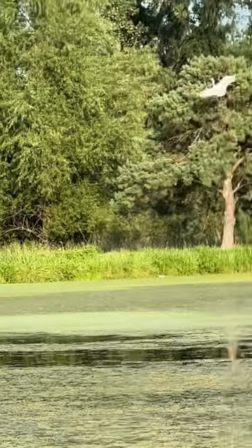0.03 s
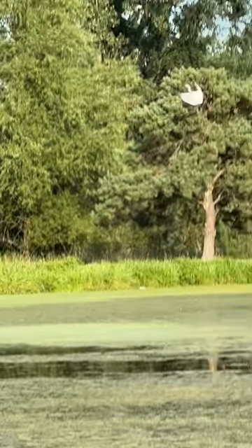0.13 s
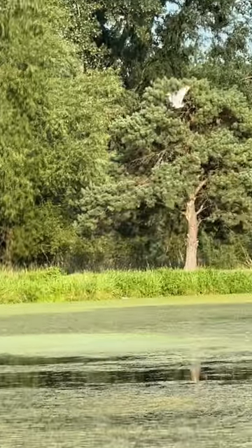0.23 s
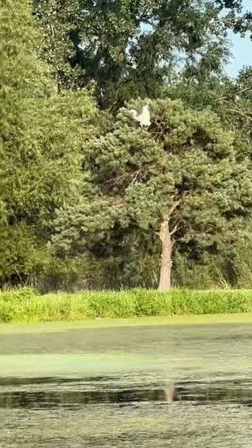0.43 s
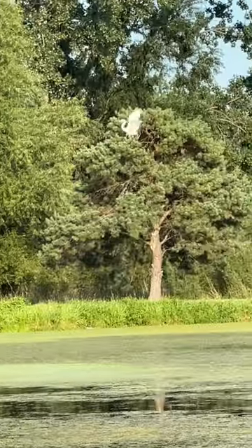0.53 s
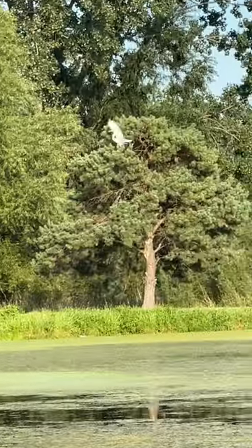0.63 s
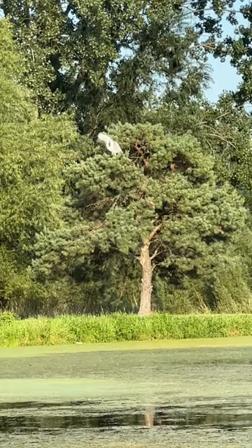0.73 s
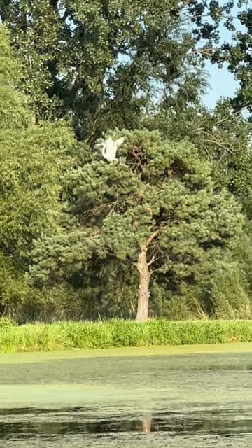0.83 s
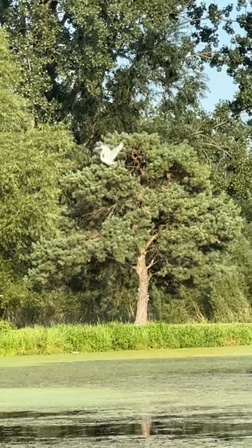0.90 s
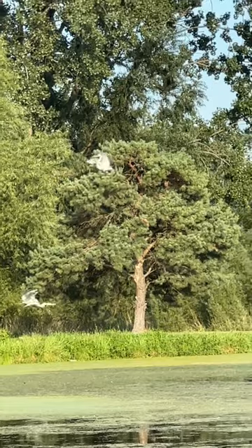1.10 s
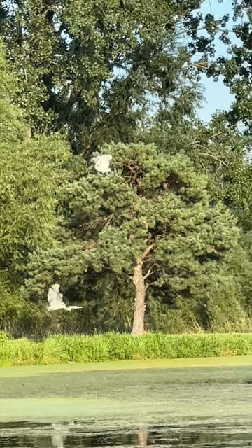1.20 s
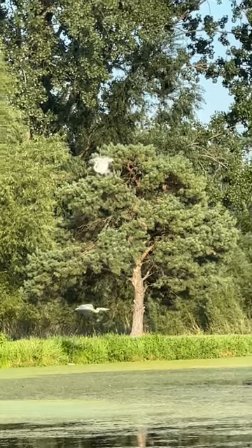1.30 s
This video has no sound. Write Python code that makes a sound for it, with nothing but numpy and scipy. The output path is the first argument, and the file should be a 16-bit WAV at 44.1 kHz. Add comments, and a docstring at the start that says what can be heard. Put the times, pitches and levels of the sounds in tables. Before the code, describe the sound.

A large water bird gives one harsh, honking squawk over faint outdoor hiss.

```python
"""A distant low rumble, a soft hiss of air and high insects, heard from the edge of a pond.
Just left of the microphone a large water bird squawks once: rising pulses of its syrinx ring
the throat in a croak, then the voice breaks into a clear, falling honk.
The trees on the far bank send back a faint echo, and one small tick sounds near the end."""
import sys
import numpy as np
from scipy import signal
from scipy.fft import rfft, irfft, next_fast_len
from scipy.io import wavfile
from scipy.ndimage import map_coordinates

SR = 44100
rng = np.random.default_rng(int(sys.argv[2]) if len(sys.argv) > 2 else 0)


def generate_wav(signal):
    """Clip the signal to [-1, 1] and save it as 16-bit WAV at the path in sys.argv[1]."""
    frames = np.transpose(np.atleast_2d(signal))
    scaled = np.clip(frames, -1, 1) * 32767
    pcm = np.round(scaled).astype(np.int16)
    wavfile.write(sys.argv[1], SR, pcm)


N = 59535
TIME = np.arange(N) / SR


def amp(db):
    """Decibels to gain."""
    return 10 ** (np.asarray(db) / 20)


def unit(x):
    """Scale to rms 1."""
    return x / np.sqrt(np.mean(x ** 2) + 1e-20)


def along(points, hz):
    """Read (Hz, value) points along a log frequency axis."""
    f, v = np.transpose(points)
    return np.interp(np.log(hz + 1), np.log(f + 1), v)


def curves(rows):
    """One value per sample for each column after the time."""
    seconds, *columns = np.transpose(rows)
    return [np.interp(TIME, seconds, column) for column in columns]


def wobble(rate):
    """A smooth random curve, rate knots a second."""
    return map_coordinates(rng.standard_normal(int(N * rate / SR) + 4), [TIME * rate])


def filtered(x, response):
    """Filter x by a gain given as a function of Hz."""
    size = next_fast_len(N + SR // 2)
    return irfft(rfft(x, size) * response(np.fft.rfftfreq(size, 1 / SR)), size)[..., :N]


def ring(spectrum, size=4096):
    """Causal impulse response of energy 1 with the given colour."""
    cepstrum = irfft(np.log(amp(along(spectrum, np.fft.rfftfreq(size, 1 / SR)))))
    cepstrum[1:size // 2] *= 2
    cepstrum[size // 2 + 1:] = 0
    impulse = irfft(np.exp(rfft(cepstrum)))
    return impulse / np.linalg.norm(impulse)


def rush(colour, width):
    """Coloured stereo noise of rms 1."""
    mid, side = filtered(rng.standard_normal((2, N)),
                         lambda hz: amp(along(colour, hz) + np.outer([0, 1], along(width, hz))))
    return unit(np.array([mid + side, mid - side]))


def scatter(t60_s):
    """A noise tail of energy 1 that falls 60 dB in t60_s."""
    return unit(rng.standard_normal(N) * amp(-60 * TIME / t60_s)) / np.sqrt(N)


def rumble():
    """A low rumble far off, swelling and sinking near the centre."""
    # Each row: time in seconds, level in dB.
    swells = [(0.0, -47), (0.314, -56.5), (0.356, -49.5), (0.47, -58), (0.492, -49.5), (0.65, -48.5),
              (0.706, -65.5), (0.782, -47), (1.07, -55), (1.154, -52), (1.184, -56.5), (1.35, -51.5)]
    # Each row: frequency in Hz, relative level in dB.
    colour = [(20, -19), (35, -16.5), (50, 2.5), (61, 6.5), (74, 0), (100, -1.5), (140, -13), (220, -21),
              (500, -42.5), (2000, -120)]
    # Each row: frequency in Hz, side over mid in dB.
    width = [(40, -20), (100, -18.5)]
    level_db, = curves(swells)
    return amp(level_db) * rush(colour, width)


def air(level_db=-57.5, swell_db=1):
    """A soft hiss of air around the microphone, gently swelling."""
    # Each row: frequency in Hz, relative level in dB.
    colour = [(60, -12), (170, 0), (400, -5), (850, -7.5), (1400, -14), (2000, -18.5), (3000, -23),
              (4300, -29), (5000, -33.5), (5550, -20.5), (6300, -33), (8000, -25.5), (9000, -69),
              (10500, -52.5), (12000, -36.5), (13800, -52.5), (15500, -41.5)]
    # Each row: frequency in Hz, side over mid in dB.
    width = [(250, -12.5), (520, -2.5), (880, 1.5), (1500, -6.5), (2600, -39), (3700, -36), (4900, 5),
             (6300, -22), (9000, -16), (12000, 9)]
    return amp(level_db + swell_db * wobble(4)) * rush(colour, width)


def insects(pulse_hz=107.3, pulse_db=2.5, uneven=.14):
    """Insects in the background: a high band of noise, pulsing fast and unevenly."""
    # Each row: time in seconds, level in dB about which the pulses swing.
    chorus = [(0.0, -67), (0.096, -73), (0.202, -63.5), (0.25, -69.5), (0.578, -70), (0.616, -64),
              (0.736, -74.5), (0.744, -67.5), (0.912, -68), (0.942, -73.5), (1.014, -65.5), (1.036, -72.5),
              (1.128, -65), (1.232, -73.5), (1.24, -64.5), (1.35, -72.5)]
    # Each row: frequency in Hz, relative level in dB.
    colour = [(3000, -88), (5500, -47), (6600, -12), (7200, -3.5), (7800, 1), (8300, -5), (8700, -23.5),
              (9200, -48.5), (11000, -93)]
    # Each row: frequency in Hz, side over mid in dB.
    width = [(6500, -25.5), (8000, -6.5)]
    level_db, = curves(chorus)
    strokes = np.sin(2 * np.pi * np.cumsum(pulse_hz * (1 + uneven * wobble(45))) / SR)
    return amp(level_db + pulse_db * strokes) * rush(colour, width)


def croak(start_s=.092, jitter_s=.00003, spread_db=.86, tighten_s=.2397, tighten_length_s=.033):
    """Slow pulses of the syrinx ring the throat, which tightens as they speed up."""
    # Each row: time in seconds, pulse rate in Hz, level into the throat in dB.
    syrinx = [(.085, 130.2, -64), (.12, 128.7, -57), (.142, 132.7, -59), (.165, 133.1, -42.5),
              (.205, 139.6, -37.5), (.23, 145.7, -38.5), (.25, 150.1, -39), (.278, 156.6, -34),
              (.294, 159.8, -38), (.3, 238.2, -38), (.306, 181.2, -27), (.313, 159.8, -28),
              (.32, 170.5, -35.5), (.331, 169, -59.5), (.35, 176.8, -80)]
    # The loose throat's resonances. Each row: frequency in Hz, relative gain in dB.
    loose_throat = [(60, -34.5), (140, -9), (280, -13.5), (420, -7), (570, 2.5), (720, -7), (880, 1),
                    (1010, 1), (1140, -3.5), (1390, -1), (1530, -9.5), (1680, -29.5), (1900, -22.5),
                    (2300, -43.5), (5500, -42), (9000, -75)]
    # The tightened throat, with the same columns.
    tight_throat = [(60, -30), (160, -10.5), (310, -29), (480, -12.5), (630, -7), (800, 0), (970, 0),
                    (1080, -0.5), (1170, 5), (1280, -4.5), (1400, -6.5), (1560, -10), (1750, -26.5),
                    (1950, -24.5), (2300, -49), (5500, -62), (9000, -81.5)]
    rate_hz, level_db = curves(syrinx)
    cycles = np.cumsum(rate_hz * (TIME > start_s)) / SR
    last_cycle = np.interp(syrinx[-1][0], TIME, cycles)
    pulse_s = np.interp(np.arange(1, last_cycle), cycles, TIME)
    slip, strength = rng.standard_normal((64, 2))[:len(pulse_s)].T
    at = np.round((pulse_s + jitter_s * slip) * SR).astype(int)
    pulses = np.bincount(at, amp(level_db[at] + spread_db * strength) * np.sqrt(SR / rate_hz[at]), N)
    rasp_db = level_db - 10 + .52 * (level_db - level_db.max())  # louder is also raspier
    rasp = amp(rasp_db) * rng.standard_normal(N) * (1 + np.cos(2 * np.pi * cycles))
    source = pulses + rasp
    tightness = np.clip((TIME - tighten_s) / tighten_length_s, 0, 1)
    return (throat(source * (1 - tightness), loose_throat, rebound_s=.003106)
            + throat(source * tightness, tight_throat, rebound_s=.0017))


def throat(source, resonances, rebound_s, rebound_db=-8.5):
    """Each pulse and its weaker rebound ring the throat."""
    doubled = filtered(source, lambda hz: 1 + amp(rebound_db) * np.exp(-2j * np.pi * hz * rebound_s))
    return signal.fftconvolve(doubled, ring(resonances))[:N]


def honk(jitter=.0025, shimmer_db=.15, flutter_db=4, fade_db_per_s=190):
    """The voice jumps two octaves to a clean tone; its unsteady overtones die first as it sags."""
    # Each row: time in seconds, pitch in Hz, level in dB, lift of the overtones in dB.
    contour = [(.293, 655.8, -53.5, -16), (.299, 683, -31, -14), (.309, 675, -33.5, 0),
               (.32, 679, -26.5, 1), (.337, 690.4, -27.5, -1), (.352, 681.5, -30, 2.5),
               (.369, 653, -31.5, 1), (.385, 606, -36.5, -2), (.397, 600.7, -44.5, -17.5),
               (.408, 591, -56.5, -24), (.43, 595, -72, -24)]
    # Each row: multiple of the pitch, relative level in dB.
    partials = [(1, -1.5), (2, 0.5), (3, -23), (4, -42), (5, -52.5), (6, -43), (7, -46), (8, -41.5),
                (9, -52)]
    pitch_hz, level_db, bright_db = curves(contour)
    unsteady_hz = pitch_hz * (1 + jitter * wobble(300))
    phase = 2 * np.pi * np.cumsum(unsteady_hz * (TIME > contour[0][0])) / SR
    fade_db = fade_db_per_s * np.maximum(TIME - TIME[np.argmax(pitch_hz)], 0)
    tone = np.zeros(N)
    for multiple, db in partials:
        upper_db = flutter_db * wobble(70) - fade_db
        tone += amp(db + bright_db * (multiple > 1) + upper_db * (multiple > 3)) * np.sin(multiple * phase)
    return np.sqrt(2) * tone * amp(level_db + shimmer_db * wobble(200)) * (TIME < contour[-1][0])


def voice_break(peak_s=.318, width_s=.0054, peak_db=-60):
    """A puff of hiss as the croak flips into the honk."""
    # Each row: frequency in Hz, relative level in dB.
    colour = [(1500, -26), (2400, 0), (3400, -9.5), (4600, 2.5), (5500, -0.5), (6200, -5.5), (7500, -26),
              (12000, -23.5), (15000, -44)]
    hiss = unit(filtered(rng.standard_normal(N), lambda hz: amp(along(colour, hz))))
    return amp(peak_db) * hiss * np.exp(-.5 * ((TIME - peak_s) / width_s) ** 2)


def far_bank(call, woods_db=-33.5, smear_db=-10.5):
    """Across the water, groups of trees return smeared echoes over a long, thin scatter."""
    # Each row: one group's delay in seconds, its gain in dB before colouring.
    echoes = [(.23, -40), (.33, -44.5), (.415, -34), (.65, -45)]
    # What the trees return. Each row: frequency in Hz, gain in dB.
    colour = [(200, -24), (680, -6), (1000, -6), (1370, 1), (2200, 4), (6000, -17)]
    answer = amp(woods_db) * scatter(t60_s=4.1)
    for delay_s, db in echoes:
        echo = amp(smear_db) * scatter(t60_s=.094)
        echo[0] += 1  # the clean reflection ahead of its smear
        start = round(delay_s * SR)
        answer[start:] += amp(db) * echo[:N - start]
    return filtered(signal.fftconvolve(call, answer)[:N], lambda hz: amp(along(colour, hz)))


def tick(start_s=1.2935, ring_hz=2340, ring_db=-53, t60_s=.019):
    """One small, dry tick: a brief ring with a softer crack of noise."""
    age = np.maximum(TIME - start_s, 0)
    crack = unit(filtered(rng.standard_normal(N), lambda hz: 1 / (1 + (hz / 4000) ** 4)))
    body = np.sin(2 * np.pi * ring_hz * age) + amp(-5) * crack
    return body * amp(ring_db - 60 * age / t60_s) * (age > 0)


def slightly_left(call, lead_s=.000015):
    """The call reaches the microphone's left side a touch sooner and mostly louder."""
    # Each row: frequency in Hz, left over right in dB.
    pan = [(300, 0.9), (600, -0.1), (950, 3.7), (1500, 0), (2700, -0.8)]
    sides = np.array([[.5], [-.5]])
    return filtered(call, lambda hz: amp(sides * along(pan, hz)) * np.exp(2j * np.pi * hz * sides * lead_s))


def scene():
    """The bird in front, its echo from the far bank and the pond side behind."""
    call = croak() + voice_break() + honk()
    return slightly_left(call) + far_bank(call) + rumble() + air() + insects() + tick()


def record(dry):
    """The recorder keeps nothing above its band limit."""
    return filtered(dry, lambda hz: hz < 15750)


dry = scene()
out = record(dry)
generate_wav(out)
```